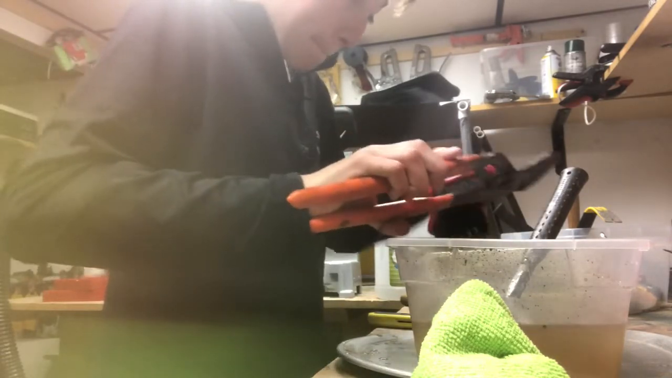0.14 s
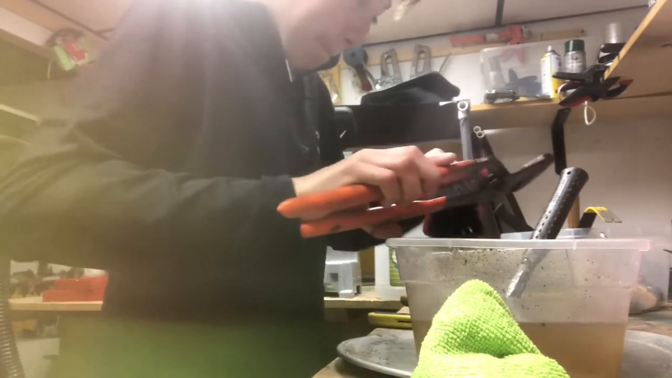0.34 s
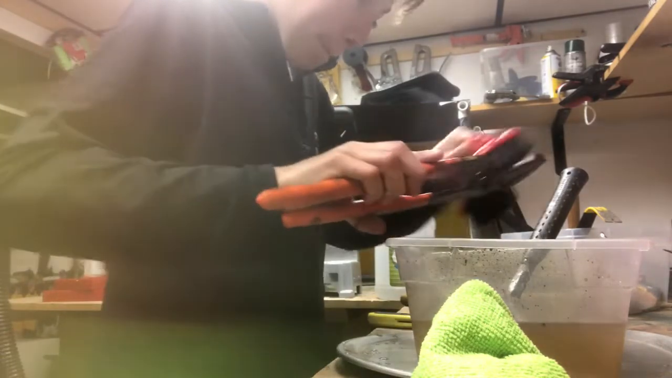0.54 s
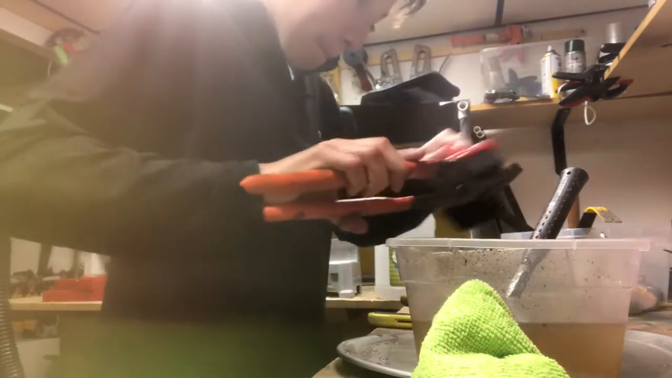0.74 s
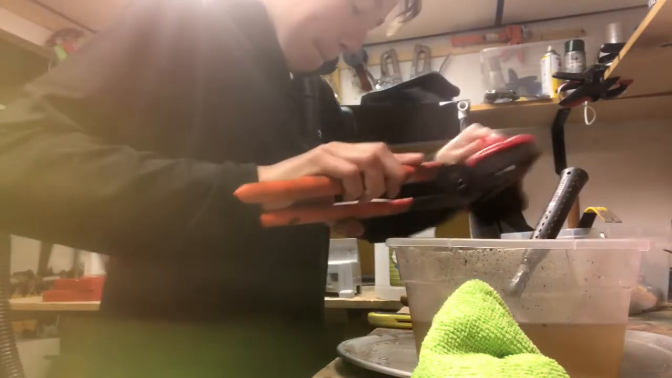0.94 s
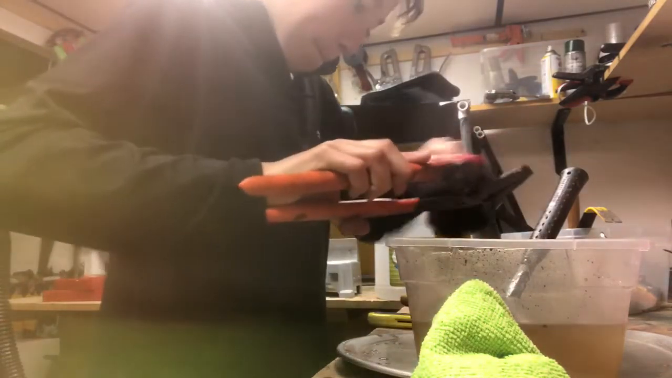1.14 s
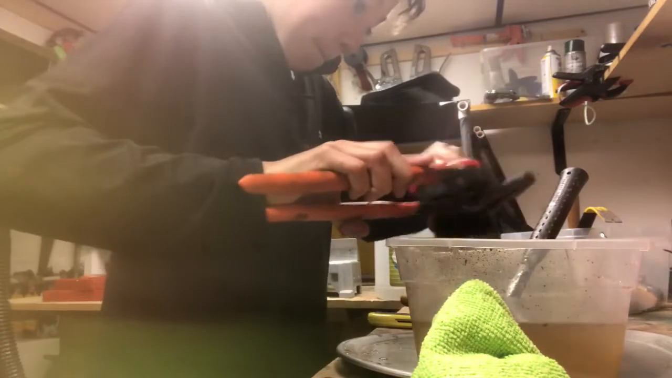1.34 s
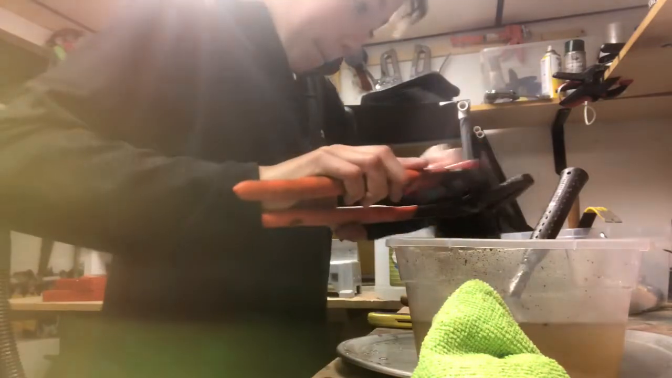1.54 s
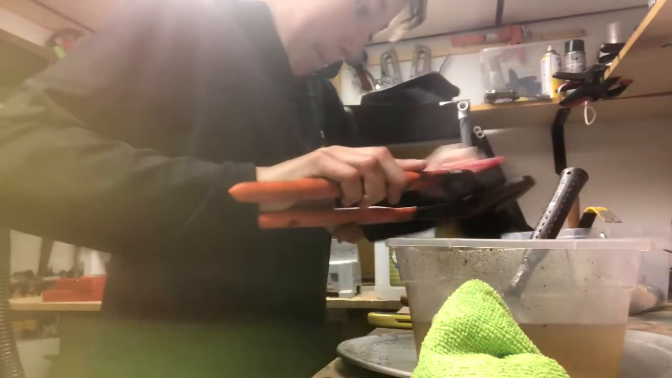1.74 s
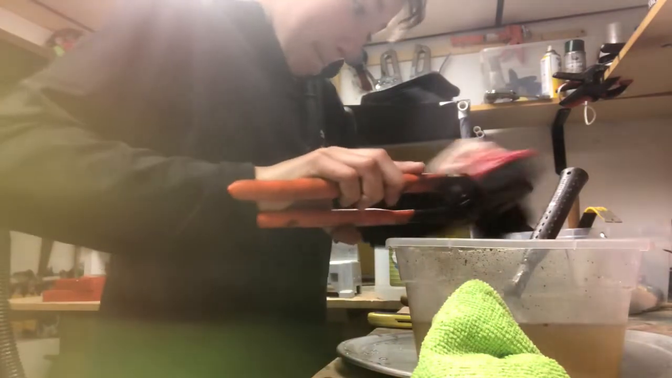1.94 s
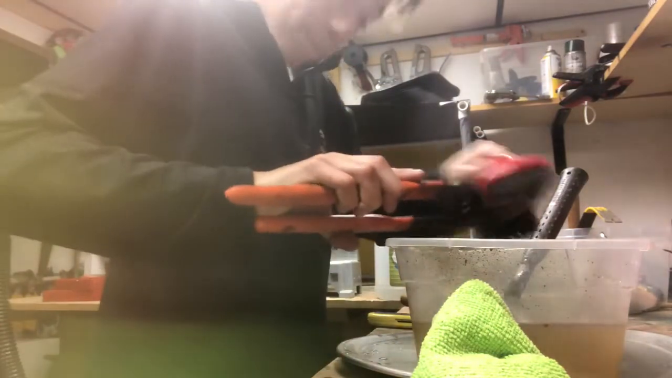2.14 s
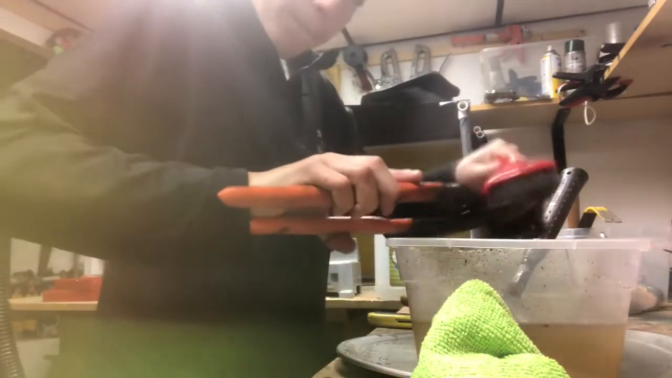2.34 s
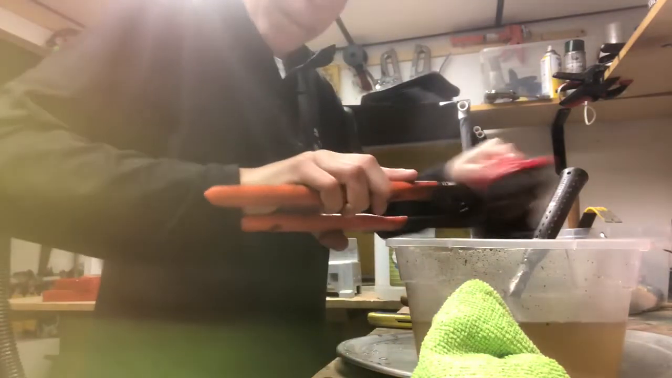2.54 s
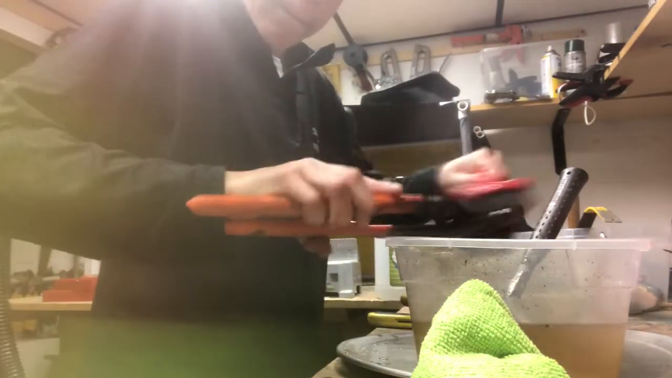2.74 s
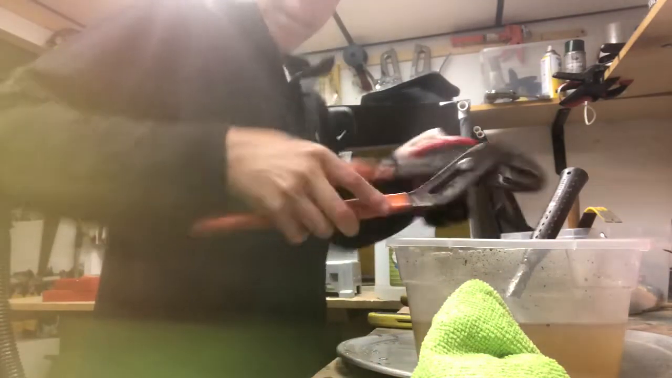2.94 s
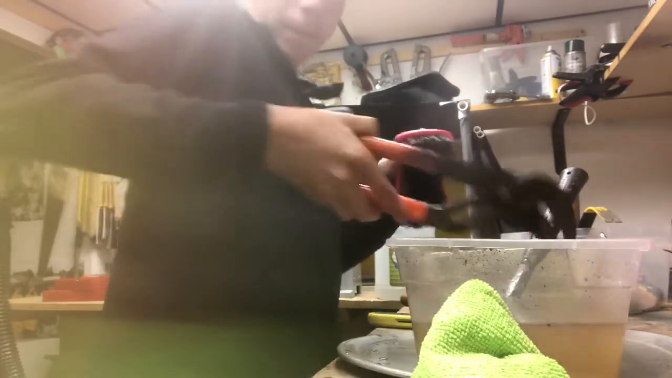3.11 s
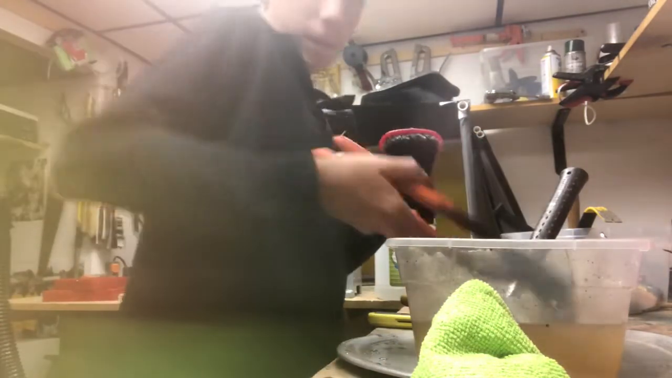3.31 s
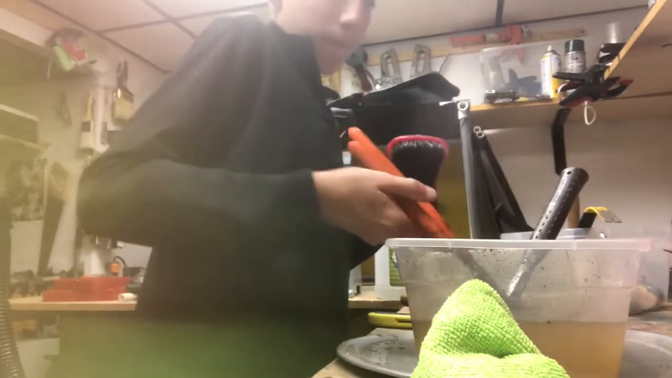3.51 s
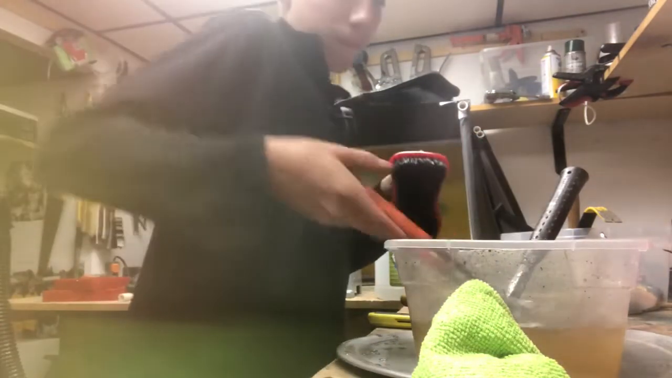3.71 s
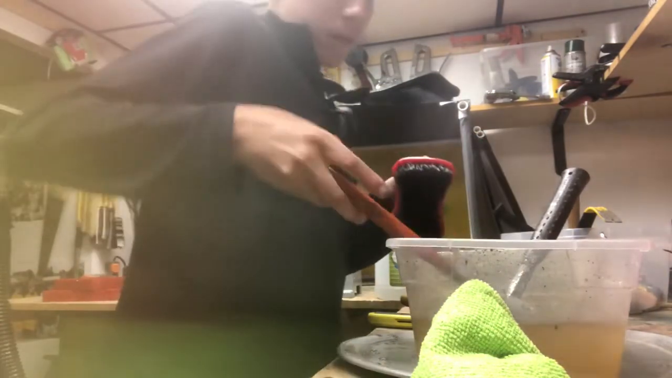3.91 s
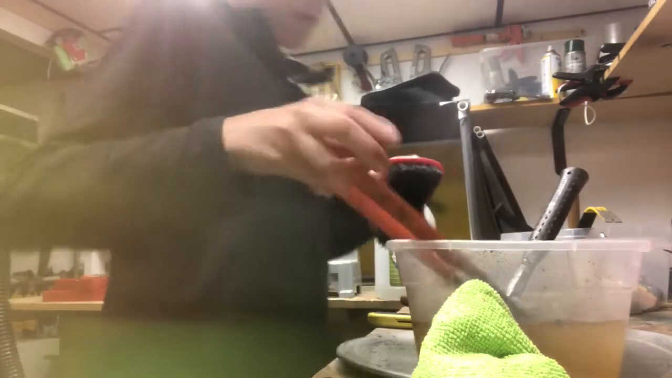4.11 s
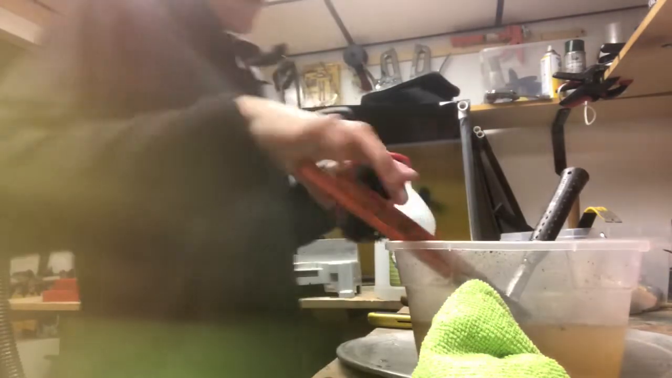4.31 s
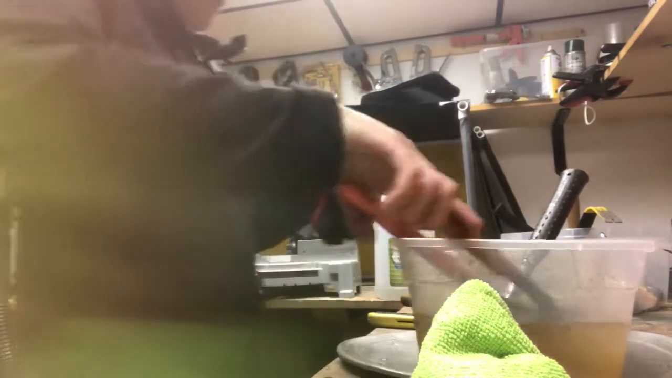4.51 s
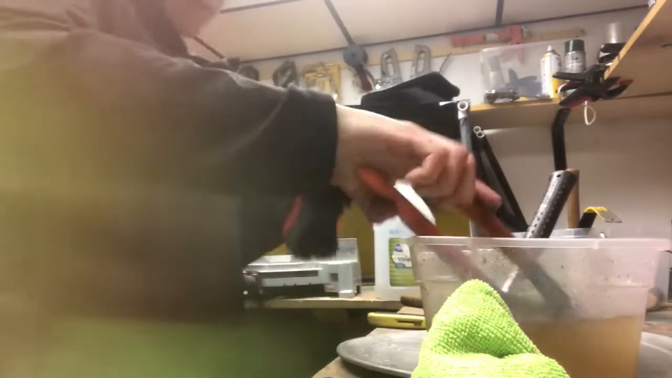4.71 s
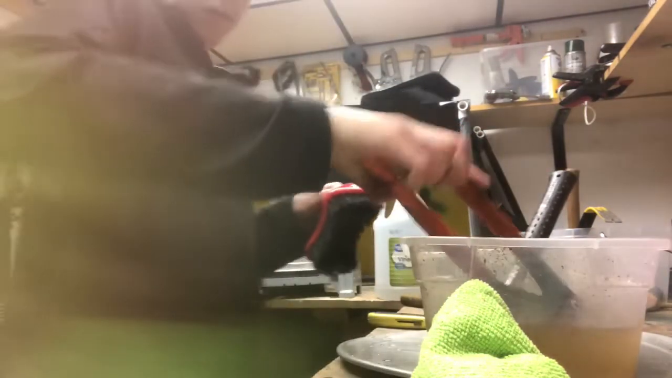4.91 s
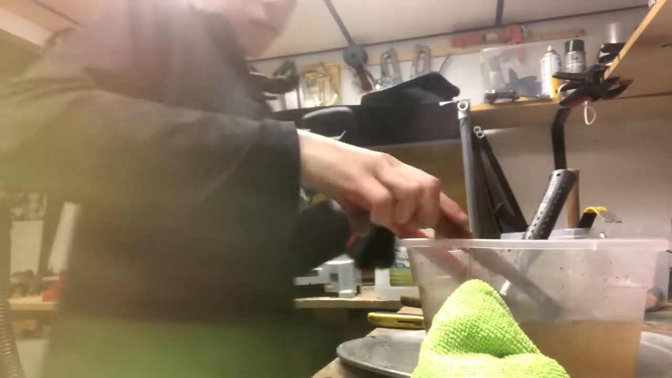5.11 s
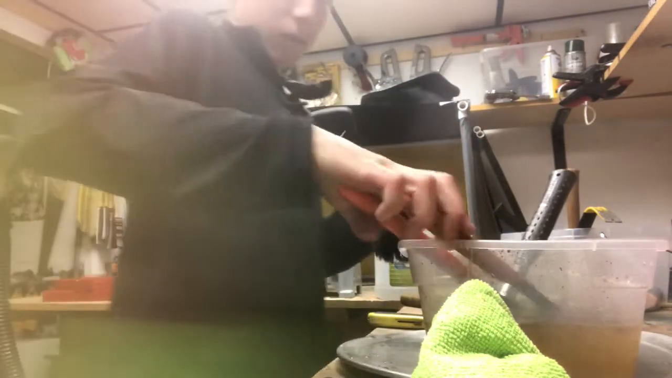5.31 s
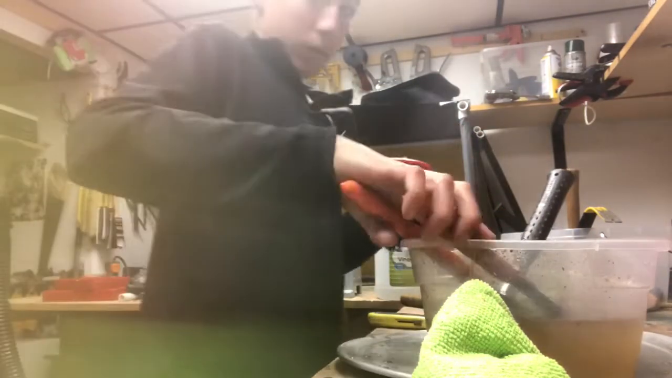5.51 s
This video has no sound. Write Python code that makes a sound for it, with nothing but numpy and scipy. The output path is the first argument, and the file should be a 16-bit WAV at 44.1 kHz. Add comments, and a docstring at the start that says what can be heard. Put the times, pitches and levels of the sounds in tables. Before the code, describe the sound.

A stiff brush scrubs metal pliers in fast strokes, then the pliers click and knock around in a plastic tub of liquid.

```python
"""A stiff brush scrubs wet, rusty pliers in a small, faintly humming workshop: friction noise swells
and fades about nine times a second, with a few light knocks and clicks. Near 2.9 s the scrubbing ends
in a sharp click of steel. From 3.4 s the pliers dip into a plastic tub of liquid, where the surface
fizzes and a few bubbles ring. They then knock and slide on the bottom until about 5.5 s, and the tub
and the bench under it boom briefly."""
import sys
import numpy as np
from scipy import signal
from scipy.fft import rfft, irfft, next_fast_len
from scipy.io import wavfile
from scipy.ndimage import uniform_filter1d

SR = 44100
rng = np.random.default_rng(int(sys.argv[2]) if len(sys.argv) > 2 else 0)


def transcribe(signal):
    """Save signal, clipped to [-1, 1], as a 16-bit WAV file at the path in sys.argv[1]."""
    frames = np.atleast_2d(signal).T
    limited = np.clip(frames, -1, 1)
    pcm = np.round(limited * 32767).astype(np.int16)
    wavfile.write(sys.argv[1], SR, pcm)


N = 244753
T = np.arange(N) / SR

# Blows of the pliers: start_s, level_db, bright_hz, boom_db, spot_hz, after_rumble_db
KNOCKS = [(.308, -55, 1200, 1.5, 690, -15.5), (.339, -57.5, 2610, -18, 1390, -16),
          (2.703, -49, 2560, 1, 1900, -20), (2.727, -53.5, 1200, 0, 367, -16),
          (3.385, -53, 2850, 1, 1110, -4), (3.4476, -31, 3220, -3, 1010, -7),
          (3.7697, -31.5, 1070, 2.5, 660, -15), (3.8251, -32.5, 3470, -1.5, 660, -10.5),
          (3.877, -43.5, 3220, -3, 1370, -6), (4.0871, -35, 780, 8.5, 400, -12.5),
          (4.369, -46.5, 1700, 8.5, 230, -4), (4.5564, -32.5, 2850, -8, 750, -9.5),
          (4.934, -55, 1500, 15.5, 1100, -14), (4.997, -55.5, 2000, -12, 880, -6),
          (5.026, -51, 850, 11, 670, -16), (5.086, -41, 1570, 1, 1240, -8)]


def amp(db):
    """Decibels to amplitude ratio."""
    return 10 ** (np.asarray(db) / 20)


def unit(x):
    """Normalisation to rms 1."""
    return x / np.sqrt(np.mean(x ** 2) + 1e-20)


def along(points, hz):
    """Interpolation of (frequency_hz, value) points on a logarithmic frequency axis."""
    f, v = np.transpose(points)
    return np.interp(np.log(hz + 1), np.log(f + 1), v)


def filtered(x, response):
    """Linear filtering: the spectrum of x times a complex frequency response."""
    m = next_fast_len(len(x) + SR // 4)
    return irfft(rfft(x, m) * response(np.fft.rfftfreq(m, 1 / SR)), m)[:len(x)]


def coloured(x, spectrum):
    """Spectral shaping by (frequency_hz, level_db) points, at rms 1."""
    return unit(filtered(x, lambda hz: amp(along(spectrum, hz))))


def resonances(modes, f):
    """Damped oscillators: one row of response for each (pitch_hz, width_hz, level_db) mode."""
    return np.array([amp(db) * 1j * f * w / (c * c - f * f + 1j * f * w) for c, w, db in modes])


def noisy_tone(samples, pitch_hz, width_hz, order):
    """A resonance driven by noise gives a wavering tone, at rms 1."""
    response = lambda hz: resonances([(pitch_hz, width_hz, 0)], hz)[0] ** order
    return unit(filtered(rng.standard_normal(samples), response))


def grit(rate_hz, spread_db):
    """Random amplitude modulation: noise whose strength changes rate_hz times a second."""
    strength = np.interp(T * rate_hz, np.arange(N), rng.standard_normal(N))
    return unit(rng.standard_normal(N) * amp(spread_db * strength))


def dying_noise(decay):
    """Frequency-dependent damping: half a second of noise dying by (frequency_hz, t60_s) points."""
    hz, t, z = signal.stft(rng.standard_normal(SR // 2), SR, nperseg=128)
    damping = amp(-60 * t / along(decay, hz)[:, None])
    return signal.istft(z * damping, SR, nperseg=128)[1][:SR // 2]


def pulse(start_s, rise_s):
    """A critically damped envelope that peaks at 1 after rise_s."""
    age = np.clip((T - start_s) / rise_s, 0, None)
    return age * np.exp(1 - age)


def add(track, start_s, sound):
    """Superposition of a sound on the track."""
    part = track[round(start_s * SR):][:len(sound)]
    part += sound[:len(part)]


def strokes(pitch_scatter=0.063):
    """Reciprocating motion: push and pull alternate, each stroke singing at its own pitch."""
    # Spells of even scrubbing: start_s, end_s, rate_hz, level_db, sing_hz
    spells = [(-.05, 0.443, 10.1, -50.5, 2980), (.765, 0.957, 5.5, -52, 3770),
              (.953, 1.067, 8.7, -49.5, 2830), (1.08, 1.758, 8.9, -46, 3800), (1.761, 2.65, 9, -45.5, 2945),
              (2.643, 2.85, 10, -44.5, 3830)]
    # Push, then pull: lead_s, length_beats, lift_db, flick_s, catch_db
    push_pull = [(.001, 0.97, 0.52, 0.0093, -8), (.005, 0.98, 0.9, 0.0037, -16)]
    for start_s, end_s, rate_hz, db, sing_hz in spells:
        count = max(1, round((end_s - start_s) * rate_hz))
        beat_s = (end_s - start_s) / count
        for k in range(count):
            lead_s, beats, lift_db, flick_s, catch_db = push_pull[k % 2]
            pitch_hz = sing_hz * np.exp(pitch_scatter * rng.standard_normal())
            yield start_s + k * beat_s - lead_s, beats * beat_s, db + lift_db, flick_s, catch_db, pitch_hz


def moving_contact(x, patchy_db=3.0):
    """As the point of excitation travels along the steel, narrow bands swell and fade at random."""
    hz, _, z = signal.stft(x, SR, nperseg=1024)
    patches = uniform_filter1d(rng.standard_normal(z.shape), size=4, axis=0)
    patches = unit(uniform_filter1d(patches, size=3, axis=1))
    depth = along([(200, .7), (2000, 1), (5000, 1), (9000, .5)], hz)[:, None]
    return unit(signal.istft(z * amp(patchy_db * depth * patches), SR, nperseg=1024)[1][:N])


def brush(drag_db=-15, sing_db=-15.5, catch_s=0.007, fizz_hz=8000):
    """Sliding friction: bristles excite the steel's modes, louder and brighter in fast mid-stroke."""
    # Friction spectrum of bristles on rust: frequency_hz, density_db
    bristles = [(88, -24), (150, -14.5), (244, -5.5), (352, -12), (436, -9), (668, -4.5), (966, -11.5),
                (1270, -9), (1910, -13), (2810, -2), (3830, -3.5), (5030, -4.5), (7410, -6), (8490, -9),
                (15500, -7)]
    # Modes of the pliers: pitch_hz, width_hz, level_db
    plier_modes = [(450, 39, 0.5), (730, 46, -10), (1738, 63, 4), (2380, 96, -1), (2760, 380, -7),
                   (3840, 200, 1.5), (4450, 450, -4.5), (7500, 500, -7)]
    power, speed, singing = np.zeros((3, N))
    t = np.arange(SR // 3) / SR
    for start_s, length_s, db, flick_s, catch_db, sing_hz in strokes():
        phase = (T - start_s) / length_s
        # the tips catch, and slide only once they have flicked over
        sliding = np.clip(2 * (T - start_s - flick_s) / catch_s, 0, 1)
        swing = np.sin(np.pi * np.clip(phase, 0, 1)).clip(0) * sliding
        catch = amp(catch_db) * pulse(start_s + flick_s, catch_s)
        drag = amp(drag_db) * np.exp(-(2 * phase - 1) ** 2 / 2.9)  # bent bristles never quite rest
        power += amp(db) ** 2 * (swing ** 2.8 + catch ** 2 + drag ** 2)
        speed = np.maximum(speed, swing)
        # each stroke lands elsewhere and keeps one narrow resonance ringing, most strongly early on
        tone = noisy_tone(len(t), sing_hz, width_hz=160, order=2)
        onset_s = max(start_s, 0)
        swell = np.sin(np.pi * np.clip((t + onset_s - start_s) / length_s, 0, 1) ** 0.82).clip(0)
        add(singing, onset_s, amp(db + sing_db) * swell * tone)
    power += (amp(-55) * pulse(start_s=.692, rise_s=.028)) ** 2  # the bristles land after a pause
    friction = coloured(grit(rate_hz=730, spread_db=1.5), bristles)
    steel = lambda hz: 1.85 + np.abs(resonances(plier_modes, hz) ** 2).sum(0)
    hiss = moving_contact(filtered(friction, steel))
    fizz = filtered(hiss, lambda hz: hz > fizz_hz)
    fizz_gain = amp(-3.0) * (0.43 + 1.01 * speed) ** 0.65
    return singing + amp(-1.34) * np.sqrt(power) * (hiss - fizz + fizz_gain * fizz)


def background():
    """Stationary noise: broadband room air, with a low drone and a faint whine in narrow bands."""
    # Spectrum of the room air: frequency_hz, density_db
    air = [(15, -66), (25, -53), (41, -23), (64, -11.5), (113, -10), (129, -11.5), (253, -12), (281, -11.5),
           (349, -14.5), (389, -12), (848, -18), (5010, -31), (7700, -32), (14300, -39.5), (15500, -38)]
    drone = noisy_tone(N, pitch_hz=58.5, width_hz=9.0, order=2)
    whine = noisy_tone(N, pitch_hz=7860, width_hz=100, order=1)
    return amp(-69) * coloured(rng.standard_normal(N), air) + amp(-73.5) * drone + amp(-89) * whine


def knocks(boom_hz=330, boom_delay_s=0.002925, treble_hz=7000, spot_db=7.5, firm_db=-30.5):
    """Impacts ring the tub's modes; dispersive bending waves carry the treble out ahead of the bass."""
    # Modes of the tub: pitch_hz, width_hz, level_db
    tub_modes = [(117.3, 9.7, -8.5), (178, 35, -11), (217.6, 16, 2.5), (289, 45, 1), (437, 49, 1.5),
                 (535, 97, -2), (612, 42, 1), (695, 42, -8), (754, 34, -1.5), (978, 72, -2.5),
                 (1176, 36, 0.5), (1420, 130, -6.5), (1646, 18, -4), (1778, 14, -2.5), (2120, 240, -8),
                 (2374, 120, -7)]
    # Rattle of densely packed modes: frequency_hz, density_db
    rattle_spectrum = [(60, -27), (170, -3), (500, 1.5), (1100, 0), (2200, 0.5), (4500, -1.5), (8000, -4),
                       (15000, -12)]
    # Damping of that rattle: frequency_hz, t60_s
    rattle_decay = [(100, 0.28), (300, 0.22), (1000, 0.12), (3000, 0.1), (10000, 0.11)]
    # Treble, falling as the jaws settle in the liquid: time_s, gain_db
    treble_curve = [(3.45, 4), (4.37, 4), (4.56, -0.5), (5.1, -4)]
    track, blow = np.zeros(N), signal.unit_impulse(SR // 2)
    crack = 1 + amp(-2.5) * np.exp(-T[:SR // 2] / 0.0039)  # the first instant of contact stands out
    for start_s, db, bright_hz, boom_db, spot_hz, _ in KNOCKS:
        strengths = amp(rng.normal(0, 2.3, len(tub_modes))) * (-1) ** np.arange(len(tub_modes))
        ring = unit(filtered(blow, lambda hz: strengths @ resonances(tub_modes, hz)))
        rattle_db = -1 + 0.55 * (firm_db - db)  # lighter touches have a larger share of rattle
        rattle = amp(rattle_db) * coloured(crack * dying_noise(rattle_decay), rattle_spectrum)
        treble_db = np.interp(start_s, *np.transpose(treble_curve))
        treble = lambda hz: amp(treble_db * (1 - 1 / (1 + (hz / treble_hz) ** 6)))
        contact = lambda hz: treble(hz) / np.hypot(1, (hz / bright_hz) ** 2.1)
        boom = lambda hz: amp(boom_db / (1 + (hz / boom_hz) ** 4))
        # each struck spot favours one band
        spot = lambda hz: 1 + (amp(spot_db) - 1) * resonances([(spot_hz, 0.18 * spot_hz, 0)], hz)[0]
        dispersion = lambda hz: np.exp(-4j * np.pi * boom_delay_s * np.sqrt(hz * boom_hz))
        knock = filtered(ring + rattle, lambda hz: contact(hz) * boom(hz) * spot(hz) * dispersion(hz))
        add(track, start_s, amp(db) * knock / np.std(knock[:SR // 50]))
    return track


def slide(edge_hz=7000, skid_db=-28, skid_rise_s=0.025, skid_t60_s=0.26):
    """Friction on a rough surface: the jaws skid after blows and drag, forcing the tub to rumble."""
    # Drags over the tub's bottom: start_s, length_s, scrape_db, rumble_db, treble_db
    drags = [(3.656, .14, -60, -49.5, -4), (3.88, 0.39, -63.5, -59, 1), (4.178, 0.12, -56.5, -64, -8),
             (4.236, 0.22, -66.5, -60.5, 1), (4.396, 0.25, -50.5, -54.5, -3.5),
             (4.623, 0.2, -71.5, -65, -6), (5.02, 0.15, -62.5, -55, -8), (5.241, 0.29, -54.5, -67, 6.5)]
    # Spectrum of the scraping jaws: frequency_hz, density_db
    scrape_spectrum = [(240, -14.5), (400, -5), (700, -6.5), (1200, -4), (2030, -13), (4400, -16),
                       (7500, -25.5), (9000, -30), (15500, -39)]
    # Spectrum of the rumbling tub: frequency_hz, density_db
    rumble_spectrum = [(18, -36), (30, -9), (81, 3.5), (140, -3.5), (225, 1.5), (317, -8.5), (606, -10.5),
                       (700, -6), (910, -54), (1540, -120)]
    scrape_power, treble_power, rumble_power = np.zeros((3, N))
    for start_s, length_s, scrape_db, rumble_db, treble_db in drags:
        swell = np.sin(np.pi * np.clip((T - start_s) / length_s, 0, 1)).clip(0) ** 1.16
        scrape_power += (amp(scrape_db) * swell) ** 2
        treble_power += (amp(scrape_db + treble_db) * swell) ** 2
        rumble_power += (amp(rumble_db) * swell) ** 2
    for start_s, db, *_, after_rumble_db in KNOCKS:
        rise = np.clip((T - start_s) / skid_rise_s, 0, 1)
        skid = rise * amp(db - 60 * np.clip(T - start_s - skid_rise_s, 0, None) / skid_t60_s)
        scrape_power += (amp(skid_db) * skid) ** 2
        rumble_power += (amp(after_rumble_db) * skid) ** 2
    scrape = coloured(grit(rate_hz=280, spread_db=2.5), scrape_spectrum)
    body = filtered(scrape, lambda hz: 1 / (1 + (hz / edge_hz) ** 6))
    treble = scrape - body
    rumble = coloured(grit(rate_hz=40, spread_db=4.5), rumble_spectrum)
    return np.sqrt(scrape_power) * body + np.sqrt(treble_power) * treble + np.sqrt(rumble_power) * rumble


def clicks(dull_hz=9000, thin_hz=1500):
    """Impact of steel on steel: a snap and some chatter excite modes that the hand damps at once."""
    # Sharp contacts: start_s, peak_db, ring_hz, width_hz, chatter_t60_s, chatter_db
    contacts = [(.479, -56.5, 3800, 905, .06, 9), (0.6968, -40.5, 3360, 350, 0.051, 27),
                (2.8995, -26, 3700, 3180, 0.019, -4.5), (4.0872, -42.5, 3100, 350, 0.024, 11),
                (4.368, -38.5, 3730, 1470, 0.089, 22), (4.669, -58, 4000, 900, 0.1, 10),
                (5.137, -54, 4670, 400, 0.022, 7), (5.247, -42, 4300, 1400, 0.17, 6.5)]
    track, t = np.zeros(N), np.arange(SR // 8) / SR
    # parts this small radiate hardly any bass
    bass_loss = lambda hz: hz ** 2 / (hz ** 2 - thin_hz ** 2 - 1j * hz * thin_hz)
    radiation = lambda hz: bass_loss(hz) / (1 + 1j * hz / dull_hz) ** 2
    for start_s, db, ring_hz, width_hz, t60_s, chatter_db in contacts:
        chatter = rng.standard_normal(len(t)) * amp(-60 * t / t60_s)
        force = signal.unit_impulse(len(t)) + amp(chatter_db) * chatter / np.linalg.norm(chatter)
        modes = [(ring_hz, width_hz, 0), (1750, width_hz / 4, -9), (6500, width_hz, -11)]
        click = filtered(force, lambda hz: resonances(modes, hz).sum(0) * radiation(hz))
        add(track, start_s, amp(db) * click / np.abs(click).max())
    return track


def bubbles(glide=0.18, onset_s=0.0021, wander=0.068):
    """Bubble resonance: trapped air rings as a spring against the liquid, wavering and rising a little."""
    # Bubbles as the jaws go under: start_s, peak_db, pitch_hz, t60_s
    trapped_air = [(3.398, -41, 1043, 0.11), (3.496, -49, 4940, 0.086), (3.508, -46, 2940, 0.058),
                   (3.524, -25, 3080, 0.017), (3.529, -48.5, 3260, 0.15), (5.001, -47, 807, 0.077)]
    track, t = np.zeros(N), np.arange(SR // 6) / SR
    for start_s, db, pitch_hz, t60_s in trapped_air:
        waver = wander * np.sqrt(pitch_hz / 1000) * np.cumsum(rng.standard_normal(len(t)))
        ring = np.sin(2 * np.pi * pitch_hz * t * (1 + glide * t) + waver)
        add(track, start_s, amp(db - 60 * t / t60_s) * (1 - np.exp(-t / onset_s)) * ring)
    return track


def splashes():
    """Surface rupture: a short burst of fine fizz each time the liquid parts around the steel."""
    # Breaks of the surface: start_s, level_db, rise_s
    breaks = [(3.408, -62, 0.016), (3.521, -69, 0.0059), (3.675, -66, 0.0088), (4.0, -66, 0.0072),
              (4.207, -64, 0.0033), (4.998, -65, 0.0088)]
    level = sum(amp(db) * pulse(start_s, rise_s) for start_s, db, rise_s in breaks)
    spray = grit(rate_hz=1700, spread_db=4)
    return level * coloured(spray, [(500, -7), (3000, 8), (7000, -3), (11000, -7), (15000, -14)])


def room(x):
    """Reverberation: convolution with the short, diffuse tail of the cluttered workshop."""
    # Reverberation times: frequency_hz, t60_s
    workshop = [(100, 0.2), (400, 0.094), (2000, 0.13), (6000, 0.15), (14000, 0.21)]
    tail = dying_noise(workshop)
    response = np.pad(tail / np.linalg.norm(tail), (SR // 300, 0))
    return signal.fftconvolve(x, response)[:N]


def scene():
    """Superposition of the direct sounds, their reverberation and the background."""
    scrub = brush()
    tub = knocks() + slide()
    small_sounds = clicks() + bubbles() + splashes()
    reverberation = room(amp(-10.0) * scrub + amp(-7.5) * tub + amp(-11) * small_sounds)
    return scrub + tub + small_sounds + reverberation + background()


def record(dry):
    """Band limiting: the deepest bass rolls off and nothing outside the passband remains."""
    bottom_hz, corner_hz, top_hz = 29, 30, 15850
    bass_cut = lambda hz: (1j * hz / (corner_hz + 1j * hz)) ** 2
    return filtered(dry, lambda hz: bass_cut(hz) * (hz > bottom_hz) * (hz < top_hz))


dry = scene()
out = record(dry)
transcribe(out)
```